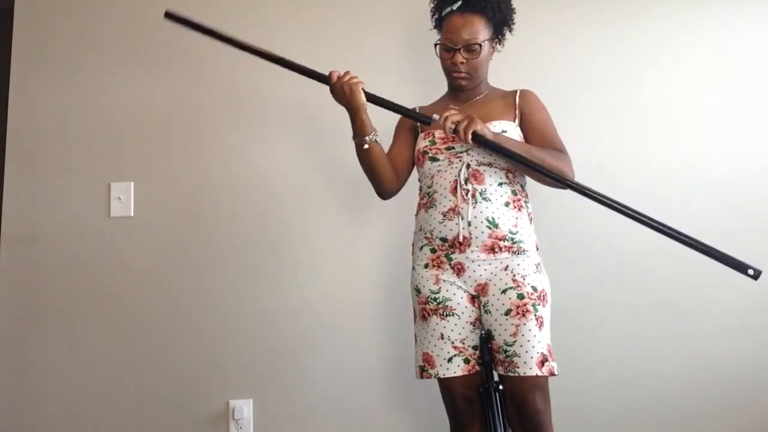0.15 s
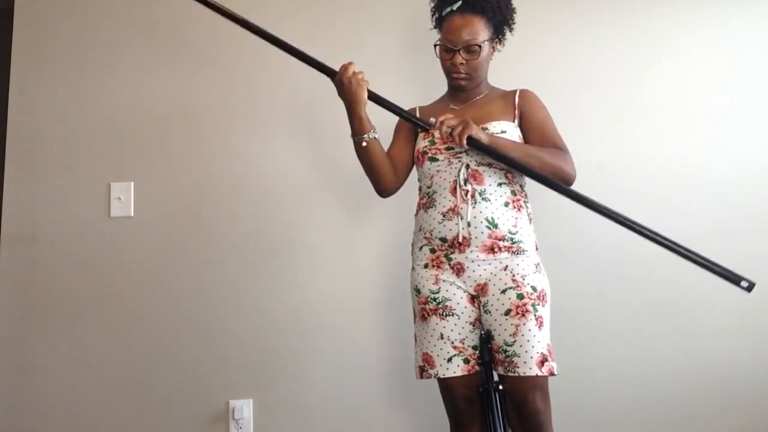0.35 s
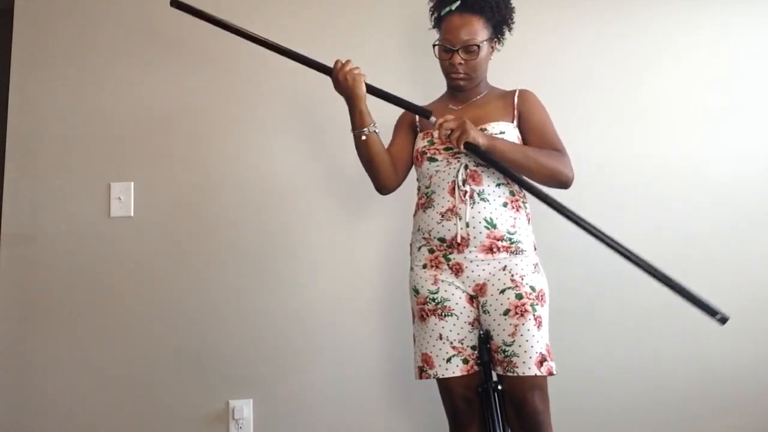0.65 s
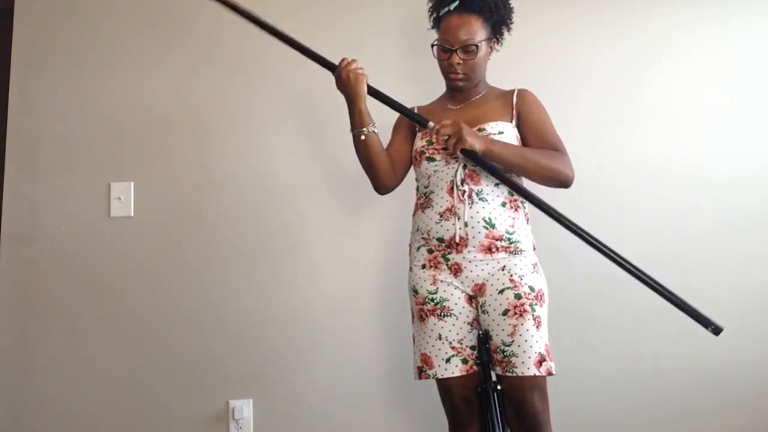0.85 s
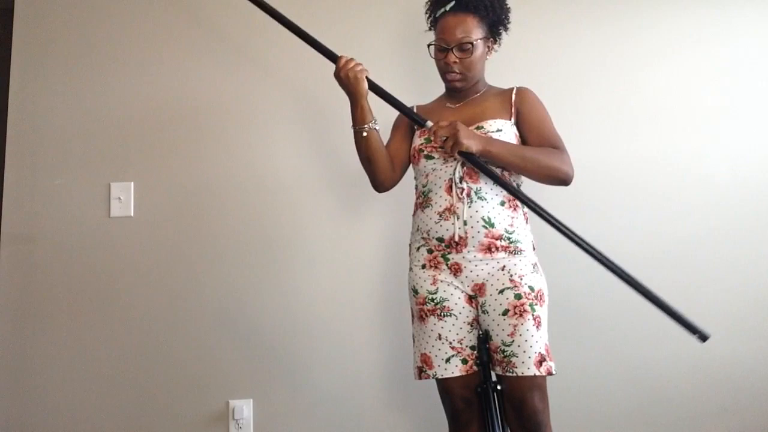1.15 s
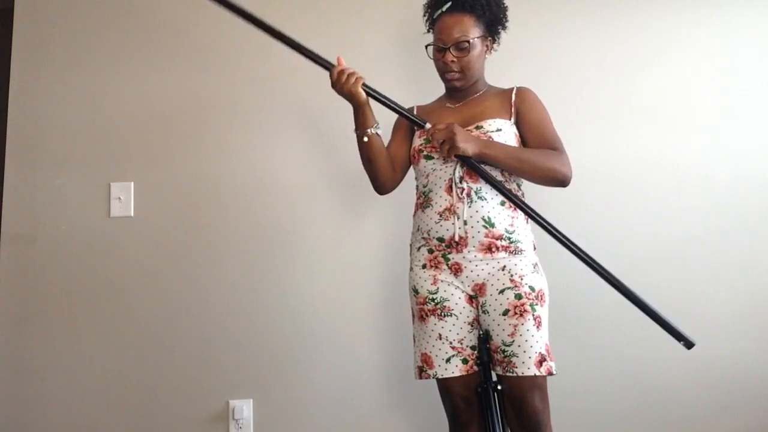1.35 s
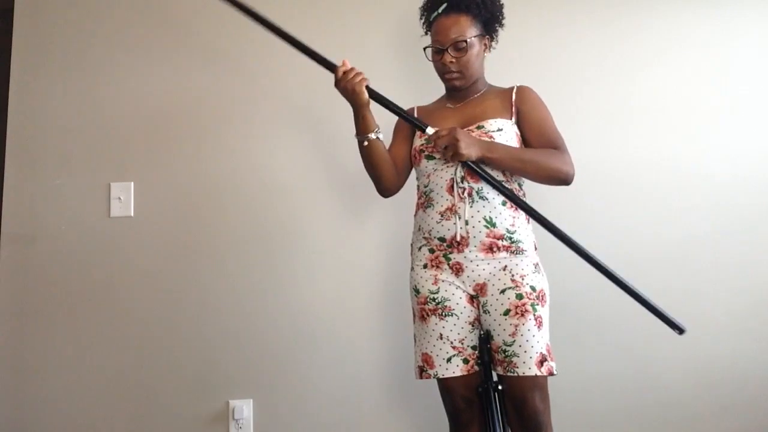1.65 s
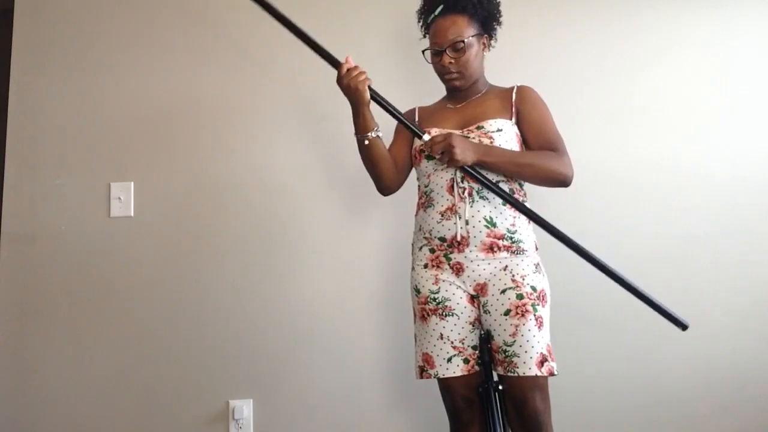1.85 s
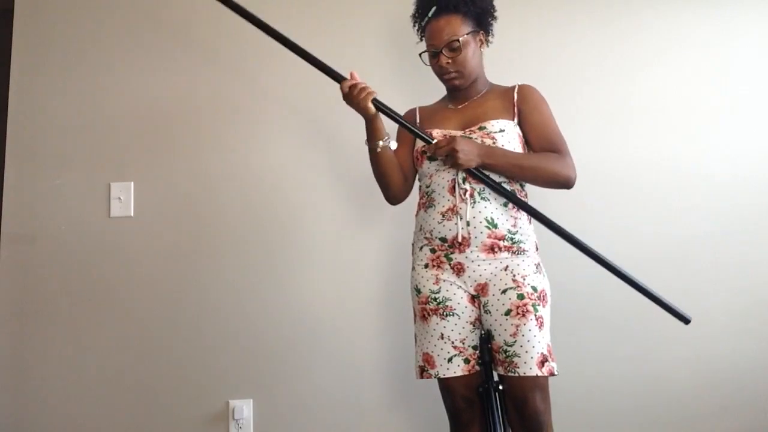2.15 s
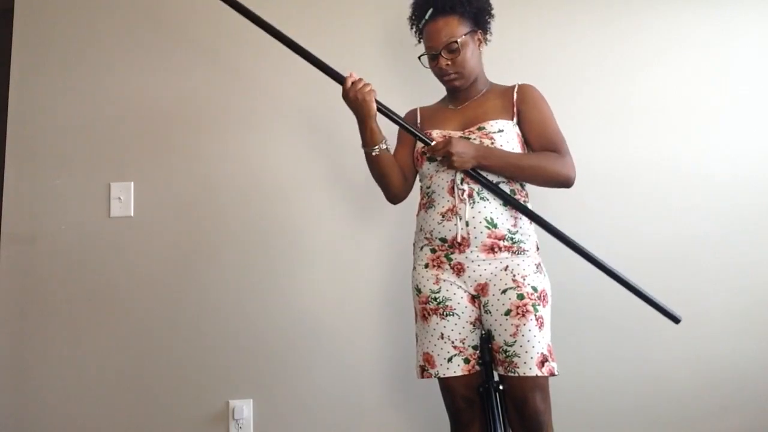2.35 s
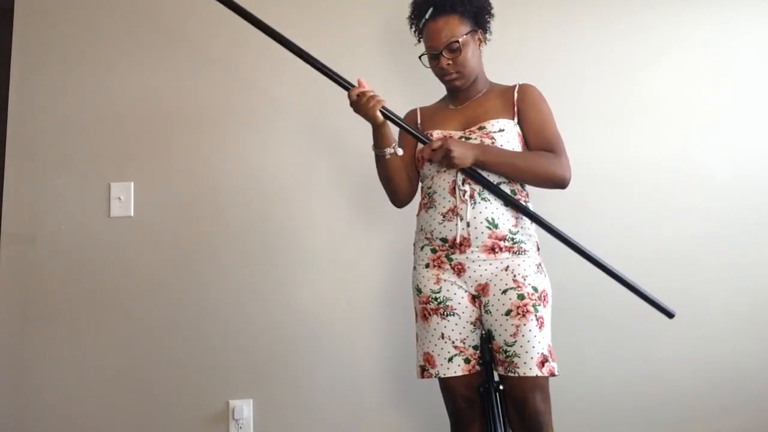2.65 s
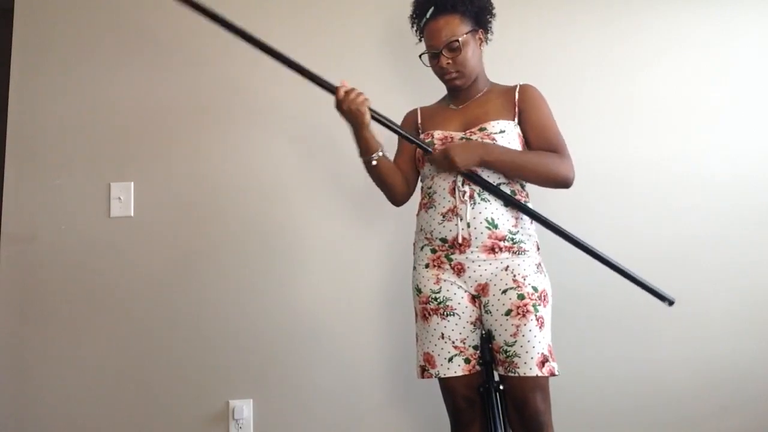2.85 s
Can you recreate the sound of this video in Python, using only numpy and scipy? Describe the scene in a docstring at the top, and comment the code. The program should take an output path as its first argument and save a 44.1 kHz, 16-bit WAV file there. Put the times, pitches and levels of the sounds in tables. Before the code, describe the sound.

Two thin metal tubes are fitted together in a bare, echoing room with faint low hum. Soft scraping comes first, then light hollow clicks around 0.4, 0.6 and 0.75 seconds, a firmer double knock at 0.94 and a stronger clack at 1.37. Quiet rubbing follows, with a scrape at 2.1 and a tick at 2.23. At 2.56 a very loud, bright clustered snap locks them, ringing to the end over a faint rub.

```python
"""A low hum and a faint scrape of metal come first, in a bare room.
Two thin tubes knock and rub as their ends are lined up; one slides into the other and a catch snaps home.
Knocks and snaps are noise bursts driving decaying sines: tube walls, open end and spring catch.
Rubs are dense random slips through the same metal. These contacts are heard directly and through
a tail of decaying noise; a locked-pole ring, a faint thump, room noise and hum join them dry."""
import sys
import numpy as np
from scipy import signal
from scipy.fft import rfft, irfft
from scipy.io import wavfile

SR = 44100
rng = np.random.default_rng(int(sys.argv[2]) if len(sys.argv) > 2 else 0)


def to_wav(s):
    """Save 16-bit WAV."""
    ch = np.atleast_2d(s).T  # columns
    pcm = np.round(np.clip(ch, -1, 1) * 32767)  # PCM
    wavfile.write(sys.argv[1], SR, pcm.astype(np.int16))


N = 132300
T = np.arange(N) / SR  # time in seconds

# Tube ends knocking. Each row: start in seconds, level in dB, catch ping in dB, tube ring in dB,
# pitch of the hollow tock in Hz, then bass, upper mids and treble in dB.
KNOCKS = [(.3755, -24, -13, -1, 880, 0, -5.5, 0.5), (.381, -24, -6, -6.5, 1380, 5.5, 0.5, -4),
          (.395, -28.5, -13, -3, 903, 1.5, -15, -11), (.613, -30, -10, -6.5, 1320, 7, -9, -5),
          (.620, -35, -3, 0.5, 1460, -1, 6, -1), (.7345, -24.5, -7, -12, 1175, 6.5, -3, -23),
          (.744, -30.5, -11, -6, 805, 5, 0, -19), (.800, -41, -10, 2, 1070, -7, -12, 0),
          (.9368, -18.5, -10, -7, 1230, 4, -6.5, -11.5), (.9415, -18.5, -26, -5, 837, 5, -0.5, -10.5),
          (.945, -21.5, -23, -16, 880, 11, -8, -12), (1.3702, -15, -3.5, -7.5, 1114, 0.5, -1, 0),
          (1.3775, -19.5, -29, -3.5, 773, 5, 10, 3), (1.3825, -17, -21, -10.5, 1118, 1.5, -5, -9),
          (2.2338, -27, -3, -8, 1890, -1.5, -6, 1.5)]
# The catch snapping home, seating and chattering. Each row: start in seconds, level in dB,
# catch ping in dB, tube ring in dB, tock pitch in Hz, then bass, upper mids and treble in dB.
SNAPS = [(2.5591, 3, -28, -3.5, 802, -6.5, 3, -4), (2.5643, 4, -8, -4.5, 771, -1.5, -4, -0.5),
         (2.57, 3, -23, -27, 694, -4, 0, 9), (2.578, 0.5, -30, -11, 1047, -2, -10, -1)]
# Metal rubbing on metal. Each row: peak in seconds, rise and fall in seconds per 20 dB, level in dB,
# then bass, upper mids, treble and catch ping in dB.
RUBS = [(.165, 0.14, 0.19, -66.5, 4, 10, 7, -10), (.26, 0.13, 0.054, -62, -1, 8, 8.5, -11),
        (.70, 0.33, 0.16, -73.5, 9, 12, 3, -21), (.92, 0.028, 0.018, -71, -4, 19, -28, 5),
        (1.371, 0.0097, 0.0081, -45, -2, 6, -3, 9), (1.66, 0.16, 0.21, -68.5, 1, 3, 0, -14),
        (2.089, 0.027, 0.045, -53.5, -4, 11, 8.5, -20), (2.117, 0.025, 0.0095, -45, 0, 4.5, 0.5, -18),
        (2.301, 0.3, 0.16, -63, -0.5, 7, 3, -16), (2.541, 0.051, 0.03, -45.5, 3.5, 2, -2.5, -10),
        (2.96, 0.18, .12, -59.5, -1, 4.5, 5, -15)]
# Ringing of the tube walls. Each row: frequency in Hz, level in dB, 60 dB decay in seconds.
TUBE_MODES = [(222, -25.5, 0.062), (480, -36, .04), (828, -29, 0.025), (1207, -19, 0.045),
              (1398, -9.5, 0.068), (1452.4, -15, 0.092), (1896, -17.5, 0.02), (2186.5, -10, 0.078),
              (2244, -8, 0.049), (2458, -15, 0.038), (3315, -15, 0.058), (3389, -9, 0.066),
              (3536, -15.5, 0.086), (4094, -15, 0.045), (4406, -12, 0.09), (5640, -10, 0.045),
              (6170, -16, .03), (6700, -19, 0.036), (7730, -24, 0.03), (8160, -16, 0.074)]
# Ringing of the spring catch. Each row: frequency in Hz, level in dB, 60 dB decay in seconds.
CATCH_MODES = [(9600, 4.5, 0.05), (10160, -0.5, 0.025)]
# The joined pole, ringing in close clusters. Each row: frequency in Hz, level in dB.
POLE_MODES = [(1378, -13.5), (1432, -8), (2180, -13), (2288, -14), (2433, -23), (3305, -22), (3430, -11),
              (3618, -20)]
# Dry crack of a knock. Each row: frequency in Hz, relative level in dB per Hz.
KNOCK_CRACK = [(170, -18), (290, -5.5), (490, 5), (670, -1), (850, 5), (1700, 7.5), (2400, 10), (2850, 2),
               (3500, 8), (6500, 12.5), (9500, 6.5), (15000, 4.5)]
# Dry crack of the catch. Each row: frequency in Hz, relative level in dB per Hz.
SNAP_CRACK = [(220, -28), (400, -9), (540, -12.5), (680, -7.5), (1050, -1.5), (2000, 2), (2850, -5),
              (3400, 3.5), (4400, 8), (5500, 1), (8200, 2.5), (11000, 1.5), (15000, -3)]
# Hiss of a rub. Each row: frequency in Hz, relative level in dB per Hz.
RUB_HISS = [(700, -2), (1300, 6), (2200, 8), (2900, 1.5), (4500, 1), (8500, -0.5), (11000, 2), (15000, -5)]
# Dying away of the room tail. Each row: frequency in Hz, 60 dB decay in seconds.
ROOM_T60 = [(250, 0.3), (900, 0.75), (1500, 0.8), (3500, 0.68), (6000, 0.74), (9000, 0.54), (14000, 0.44)]
# Low notes blooming in the room. Each row: frequency in Hz, dB added to the tail.
TAIL_BLOOM = [(400, 7), (900, 0.5)]
# Colour of the room noise. Each row: frequency in Hz, relative level in dB per Hz.
ROOM_NOISE = [(30, -56), (50, -24), (70, -5.5), (100, -6.5), (170, -2), (270, 3), (450, -4.5), (750, -11),
              (1400, -14.5), (4000, -19), (15000, -20.5)]

BASS_HZ, MID_HZ, UPPER_MID_HZ, TREBLE_HZ = 1140, 2200, 3520, 10100  # where contact colour is set
STRIKE_SPREAD_DB = 1  # random spread of each mode from one contact to the next
TOCK_T60_S, POLE_T60_S = 0.089, 1
SLIPS_PER_S, SLIP_SPREAD_DB = 3500, 3.5
RUB_DIRECT_DB, RUB_LOW_HZ = 5.5, 750
RUB_RING_DB, RUB_PING_DB = -11, 0.5  # tubes against the hiss; how readily rubbing makes the catch sing
THUMP_HZ, THUMP_T60_S, THUMP_DB = 40, 0.06, -70
EARLY_DB, EARLY_HOLD_S, EARLY_T60_S = 2.5, 0.0069, 0.12
TAIL_DB, TAIL_BUILD_S = 0, 0.017
FLOOR_DB, HUM_HZ, HUM_DB = -64, 121, -73
CUTOFF_HZ = 15500


def blows(rows, crack, direct_db, tock_db, low_hz, crunch_t60):
    """Sharp contacts: a crunch of micro-slips rings the walls and the open end, and the catch pings."""
    total = 0
    for start, db, ping_db, ring_db, tock_hz, *colour in rows:
        crunch = unit(rng.standard_normal(SR) * from_db(-60 * T[:SR] / crunch_t60))
        walls = from_db(ring_db) * ringing(TUBE_MODES)
        # air in the open end: its pitch shifts as the ends cover each other
        tock = ringing([(tock_hz, tock_db, TOCK_T60_S)])
        echoes = room()
        ping = from_db(ping_db) * ringing(CATCH_MODES)
        metal = contact(crack, walls + tock, *colour, low_hz)
        heard_metal = play(metal, from_db(direct_db) * crunch + echoes)[:SR]
        heard_ping = ping + play(ping, echoes)[:SR]
        total = total + from_db(db) * placed(heard_metal + 0.5 * heard_ping, start)
    return total


def locked_pole():
    """Once locked, the joined pole rings on in slowly decaying modes from the first snap."""
    modes = [(hz, db, POLE_T60_S) for hz, db in POLE_MODES]
    return placed(ringing(modes), SNAPS[0][0])


def thump():
    """The snap jolts the air: a faint, quickly fading low sine as the catch lands."""
    t = np.maximum(T - SNAPS[0][0], 0)
    return from_db(THUMP_DB - 60 * t / THUMP_T60_S) * np.sin(2 * np.pi * THUMP_HZ * t)


def rubs():
    """Dense tiny slips excite the tubes and the catch under a stroke that swells and dies away."""
    tubes, catch = 0, 0
    for peak, rise, fall, db, *colour, ping_db in RUBS:
        happens = rng.random(N) < SLIPS_PER_S / SR
        direction = rng.choice([-1, 1], N)
        strength = from_db(SLIP_SPREAD_DB * np.minimum(rng.exponential(1, N), 4))
        slips = happens * direction * strength
        swell_db = db - 20 * np.maximum((peak - T) / rise, (T - peak) / fall)
        stroke = slips / slips.std() * from_db(swell_db)
        walls = from_db(RUB_RING_DB) * ringing(TUBE_MODES)
        tubes = tubes + play(stroke, contact(RUB_HISS, walls, *colour, RUB_LOW_HZ))
        catch = catch + from_db(ping_db) * stroke
    heard_tubes = from_db(RUB_DIRECT_DB) * tubes + play(tubes, room())
    return heard_tubes + from_db(RUB_PING_DB) * play(catch, ringing(CATCH_MODES))


def contact(grain, rings, bass_db, upper_db, treble_db, low_hz):
    """Dry grain and ringing metal, coloured by where and how hard the tubes meet."""
    metal = rings + placed(shaped_click(grain), 0)[:SR]
    colour = shaped_click([(BASS_HZ, bass_db), (MID_HZ, 0), (UPPER_MID_HZ, upper_db), (TREBLE_HZ, treble_db)])
    low_cut = signal.butter(4, low_hz, "high", fs=SR, output="sos")
    return signal.sosfilt(low_cut, play(metal, colour)[:SR])


def ringing(modes):
    """Decaying sines: each contact drives the modes with new strengths and phases."""
    chance, t = rng.standard_normal((len(modes), 2)), T[:SR]
    total = 0
    for (hz, db, t60), (strength, phase) in zip(modes, chance):
        tone = unit(np.sin(2 * np.pi * (hz * t + phase)) * from_db(-60 * t / t60))
        total = total + from_db(db + STRIKE_SPREAD_DB * strength) * tone
    return total


def room():
    """Near reflections and a tail whose bass blooms and whose decay varies with pitch, drawn anew each call."""
    t = T[:SR]
    hz, s, cells = signal.stft(rng.standard_normal(SR), SR, nperseg=256)
    tail_db = at_hz(TAIL_BLOOM, hz)[:, None] - 60 * s / at_hz(ROOM_T60, hz)[:, None]
    tail = signal.istft(cells * from_db(tail_db), SR)[1][:SR]
    tail = tail * (1 - np.exp(-t / TAIL_BUILD_S))
    early = rng.standard_normal(SR) * from_db(-60 * np.maximum(t - EARLY_HOLD_S, 0) / EARLY_T60_S)
    return from_db(EARLY_DB) * unit(early) + from_db(TAIL_DB) * unit(tail)


def background():
    """Steady room tone: noise shaped by pitch, with a sine for the low hum."""
    air = play(rng.standard_normal(N), shaped_click(ROOM_NOISE))
    hum = np.sqrt(2) * np.sin(2 * np.pi * HUM_HZ * T)
    return from_db(FLOOR_DB) * air + from_db(HUM_DB) * hum


def from_db(db):
    """Decibels to gain."""
    return 10 ** (np.asarray(db) / 20)


def unit(x):
    """Scale to an energy of one."""
    return x / np.sqrt(np.sum(x ** 2) + 1e-20)


def at_hz(points, hz):
    """Read a table on a log-frequency axis."""
    f, v = np.transpose(points)
    return np.interp(np.log(np.maximum(hz, 1)), np.log(f), v)


def play(x, response):
    """Pass a sound through an impulse response."""
    return signal.fftconvolve(x, response)[:N]


def placed(sound, start):
    """Start a sound at the given time in seconds."""
    return np.pad(sound, (int(start * SR), N))[:N]


def shaped_click(spectrum, size=4096):
    """A causal click of unit energy with the given spectrum, made minimum-phase by folding its cepstrum."""
    gain = from_db(at_hz(spectrum, np.fft.rfftfreq(size, 1 / SR)))
    cepstrum = irfft(np.log(gain))
    cepstrum[1:size // 2] *= 2
    cepstrum[size // 2 + 1:] = 0
    return unit(irfft(np.exp(rfft(cepstrum))))


def scene():
    """Knocks, rubs and the final snap, over the room tone."""
    knocks = blows(KNOCKS, KNOCK_CRACK, direct_db=5.0, tock_db=-20, low_hz=197, crunch_t60=0.033)
    snap = blows(SNAPS, SNAP_CRACK, direct_db=3, tock_db=-26, low_hz=330, crunch_t60=0.01)
    return (knocks + snap + locked_pole() + rubs() + thump() + background())[None]


def record(dry):
    """Peaks are softly rounded and the top is cut."""
    rounded = 0.81 * np.tanh(dry / 0.74)
    top_cut = signal.ellip(12, 0.2, 70, CUTOFF_HZ, fs=SR, output="sos")
    return signal.sosfilt(top_cut, rounded)


dry = scene()
out = record(dry)
to_wav(out)
```